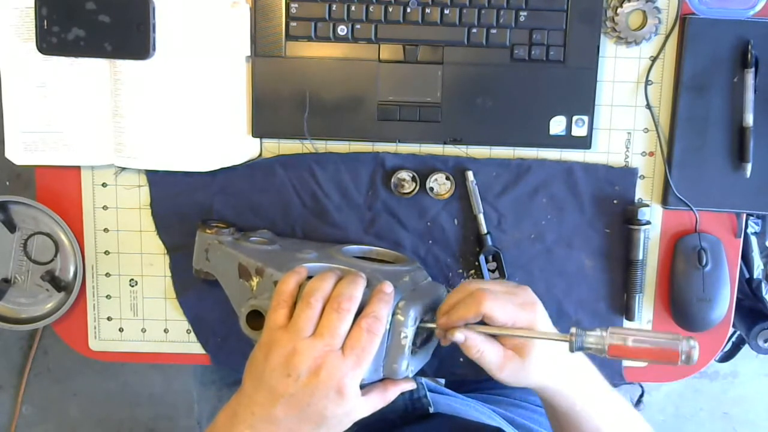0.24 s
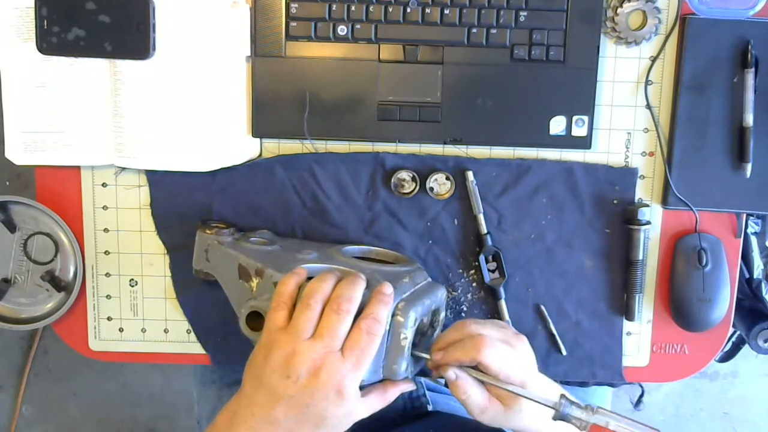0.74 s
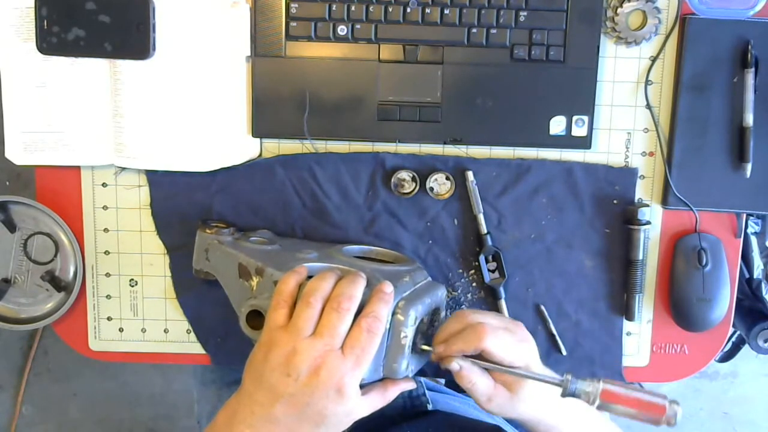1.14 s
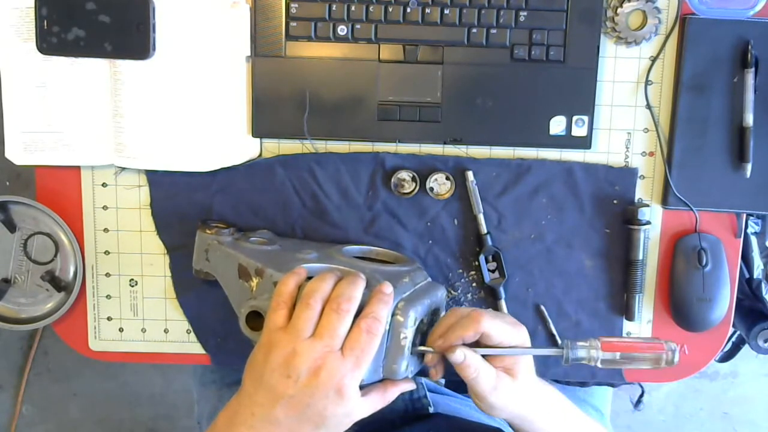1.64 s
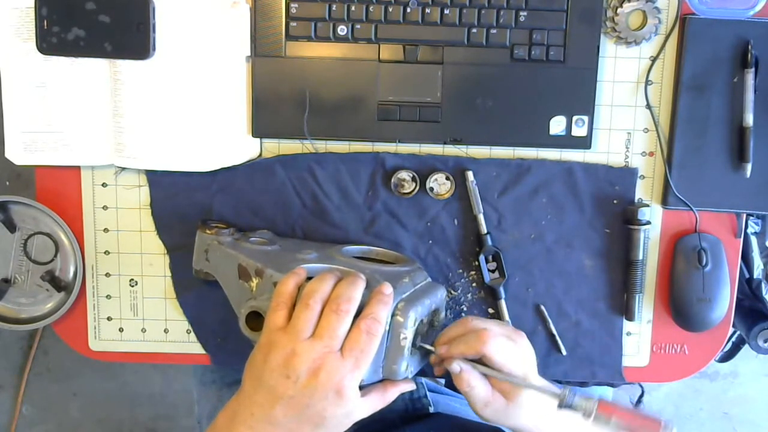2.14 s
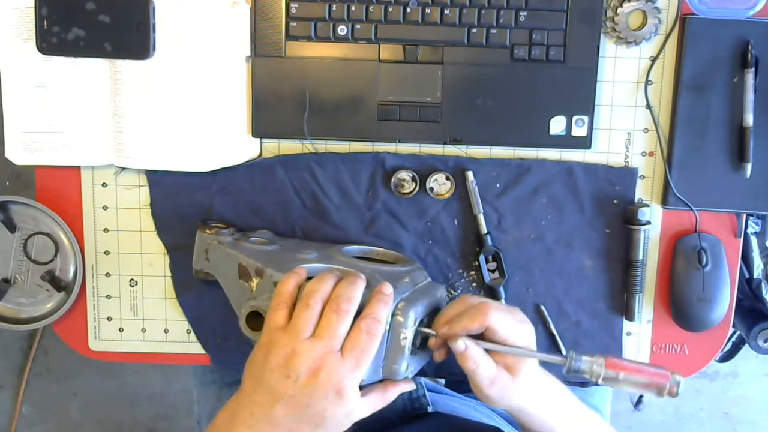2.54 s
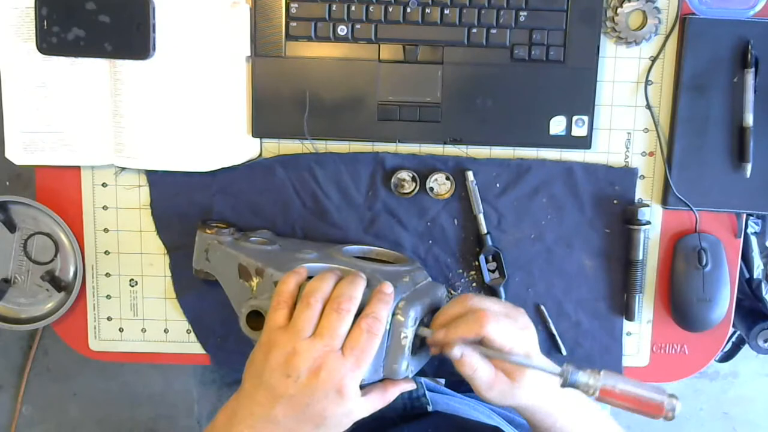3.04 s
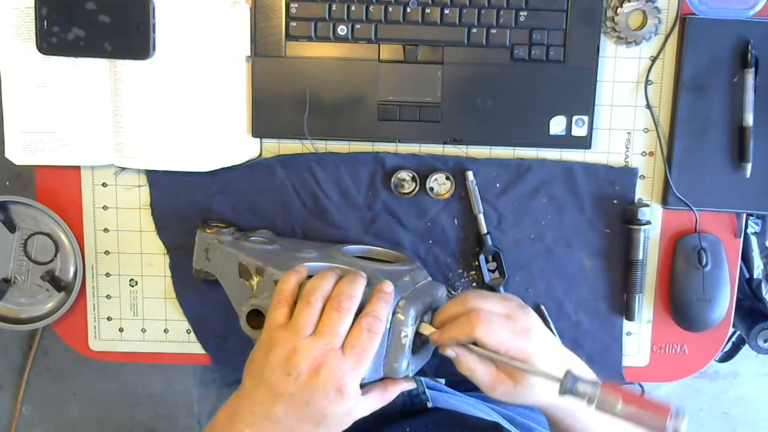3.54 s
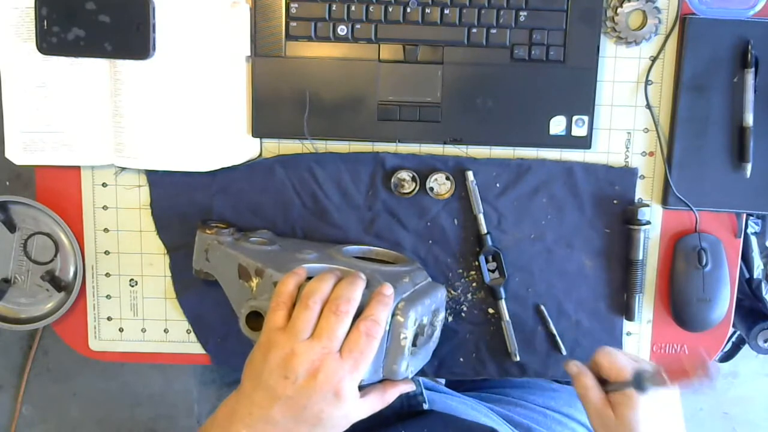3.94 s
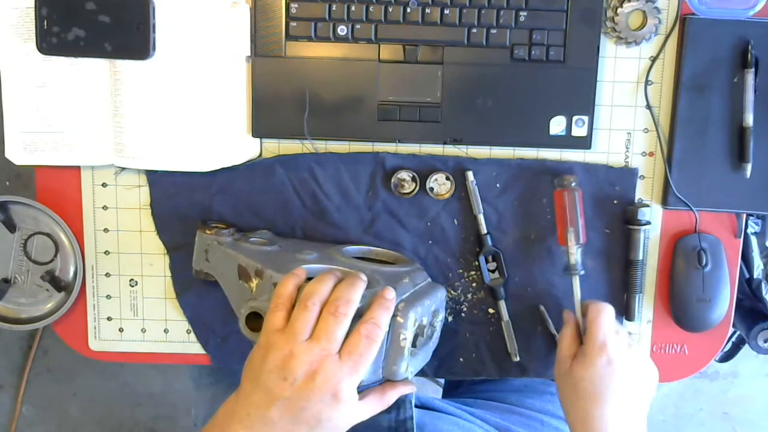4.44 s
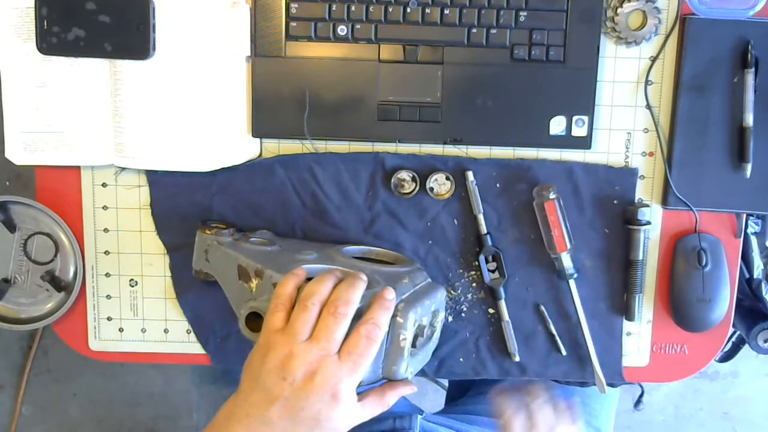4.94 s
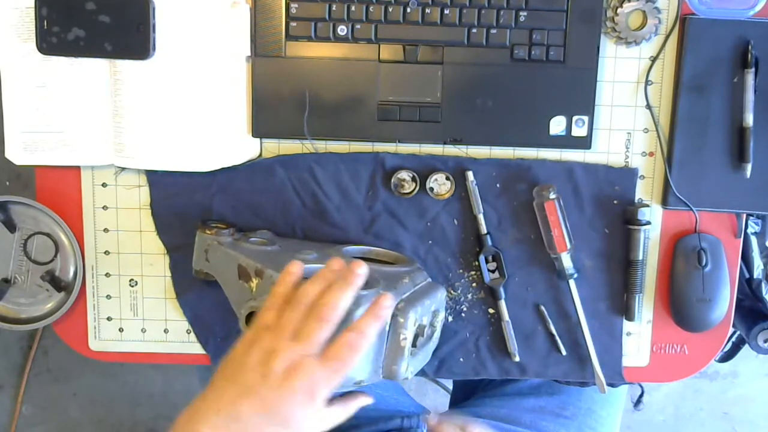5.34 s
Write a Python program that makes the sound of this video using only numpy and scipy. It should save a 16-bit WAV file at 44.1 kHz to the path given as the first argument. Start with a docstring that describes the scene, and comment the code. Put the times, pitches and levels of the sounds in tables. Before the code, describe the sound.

Close, muffled-top microphone in a small room, steady soft hiss. Brief gritty scratches and light clicks of a blade on cast metal come irregularly for over four seconds, with low shudders of the bench. Then a near pause with a faint rub of skin, a sudden loud metallic crack and woody thud, a short reverberant tail, and a last cluster of soft knocks and scrapes.

```python
"""A small room with a cloth-covered bench: a screwdriver blade picks and scrapes paint off a hollow metal casting.
Bursts of tiny clicks and single taps ring the casting's modes; flakes tick as filtered clicks.
The effort shakes the bench, heard as low resonant noise, with short tones when the casting judders.
At the end the casting tips, knocks on the bench and rocks back: ringing thuds, noise cracks, a room tail.
Under it all lies microphone hiss, mostly below about 8 kHz."""
import sys
import numpy as np
from scipy import signal
from scipy.io import wavfile

SR = 44100
rng = np.random.default_rng(int(sys.argv[2]) if len(sys.argv) > 2 else 0)


def store_wav(level_fs):
    """Save 16-bit WAV to argv[1]."""
    pcm = np.round(np.clip(np.atleast_2d(level_fs), -1, 1) * 32767)
    wavfile.write(sys.argv[1], SR, pcm.T.astype(np.int16))


N = 245637
TIME = np.arange(N) / SR
BITE_S = 0.2   # window that holds one bite, and either side of one jolt
RAGGED_DB = 1.5   # rms flicker of the uneven level


def from_db(db):
    """Gain of a level in dB."""
    return 10 ** (np.asarray(db) / 20)


def rms_one(x):
    """Scales a signal to rms 1."""
    return x / np.sqrt(np.mean(x ** 2) + 1e-20)


def level_curve(points):
    """Reads a (t/s, level/dB) curve at every sample."""
    times, levels_db = np.transpose(points)
    return np.interp(TIME, times, levels_db)


def at_hz(points, hz):
    """Reads a curve over frequency on a log axis."""
    freqs, values = np.array(points).T
    return np.interp(np.log(hz), np.log(freqs), values)


def steep(x, hz, kind, order):
    """A Butterworth filter."""
    return signal.sosfilt(signal.butter(order, hz, kind, fs=SR, output="sos"), x)


def add(track, s, part):
    """Lays a part into a track at a time in seconds."""
    at = round(s * SR)
    track[..., at:at + part.shape[-1]] += part[..., :N - at]


def arch(length_s):
    """Half a sine: swells and sinks once."""
    return np.abs(np.sin(np.pi * TIME[:round(length_s * SR)] / length_s))


def ring(force, hz, t60):
    """One damped mode: a unit click sets a sine of height 1 ringing."""
    radius = from_db(-60 / (t60 * SR))
    angle = 2 * np.pi * hz / SR
    # the tiny offset keeps the filter clear of denormal numbers
    return signal.lfilter([0, np.sin(angle)], [1, -2 * radius * np.cos(angle), radius ** 2], force + 1e-18)


def hum(peaks):
    """Noise through resonances of given bandwidth; rms 1."""
    total = 0
    for hz, width_hz, db in peaks:
        t60 = np.log(1000) / (np.pi * width_hz)
        total = total + from_db(db) * rms_one(ring(rng.standard_normal(N), hz, t60))
    return rms_one(total)


def bands(spectrum, length):
    """Third-octave noise bands shaped by a spectrum: centres and rows, together rms 1."""
    edges = 30 * 2 ** (np.arange(29) / 3)
    centres = np.sqrt(edges[1:] * edges[:-1])
    white = rng.standard_normal((2, length))   # neighbouring bands take different noise
    rows = np.array([from_db(at_hz(spectrum, hz)) * steep(white[k % 2], edges[k:k + 2], "band", order=3)
                     for k, hz in enumerate(centres)])
    return centres, rows / np.std(rows.sum(0))


def uneven():
    """A gain that flickers within a few ms."""
    return from_db(RAGGED_DB * rms_one(steep(rng.standard_normal(N), 120, "low", order=2)))


def grains():
    """Tiny catches of an edge on a rough surface: random clicks of uneven size; rms 1."""
    grains_per_s = 4000   # on average
    sizes = from_db(1.4 * np.minimum(rng.exponential(1, N), 4)) * rng.choice([-1, 1], N)
    return rms_one(sizes * (rng.random(N) < grains_per_s / SR))


def bite(db, slide_s):
    """Blade pressure that swells, slides and dies."""
    rise_s, dying_s = 0.0012, 0.049   # time constant of the swell; time to fall 60 dB
    after = TIME[:round(BITE_S * SR)]
    return from_db(db - 60 * np.maximum(after - slide_s, 0) / dying_s) * (1 - np.exp(-after / rise_s))


# colour of the hiss: (f/Hz, relative level/dB per Hz)
HISS_SPECTRUM = [(35, -46), (60, -24.5), (123, -22), (182, -21), (281, -4.5), (352, -6), (433, -7),
                 (653, -5), (889, -12), (1070, -9), (1790, -13.5), (3460, -21), (8200, -22.5),
                 (10700, -7.5), (18000, -120)]


def hiss():
    """Steady microphone noise: coloured hiss cut steeply at the top, over a much fainter, wider one."""
    coloured = from_db(-62) * bands(HISS_SPECTRUM, N)[1].sum(0)
    faint = from_db(-80) * steep(rng.standard_normal(N), 9000, "low", order=1)
    return steep(coloured, 8270, "low", order=14) + faint


# the arms lean on the bench top: (t/s, level/dB before the waver)
ARM_SHAKE = [(0.0, -63.5), (0.71, -70), (1.14, -70.5), (1.39, -62), (1.81, -70), (2.41, -71), (2.75, -64),
             (2.9, -63.5), (3.14, -64), (3.35, -63.5), (3.56, -66.5), (3.87, -67), (3.99, -68),
             (4.19, -67.5), (4.51, -63), (4.97, -69), (5.1, -77.5), (5.19, -59)]
# resonances of the bench top: (f/Hz, width/Hz, relative level/dB)
TOP_RESONANCES = [(223, 10, -3), (266.7, 12, 3.5), (300, 20, -0.5), (344.2, 19, 2.5)]


def top_hum():
    """The bench top murmurs under the working arms, which are never steady."""
    waver_db, waver_hz = 3.5, 14   # rms and upper edge of the unsteadiness
    waver = rms_one(steep(rng.standard_normal(N), waver_hz, "low", order=2))
    return from_db(level_curve(ARM_SHAKE) + waver_db * waver) * hum(TOP_RESONANCES)


# the frame is jolted: (t/s, peak level/dB of the added hum)
FRAME_JOLTS = [(0.24, -72), (0.76, -61), (0.86, -61), (1.229, -64), (1.84, -69), (2.08, -72), (2.61, -72),
               (2.75, -68), (2.881, -53.5), (3.285, -54), (3.335, -56), (3.57, -67), (3.71, -76),
               (3.9, -58.5), (4.03, -60.5), (4.43, -74), (4.96, -63.5)]
# resonances of the bench frame: (f/Hz, width/Hz, relative level/dB)
FRAME_RESONANCES = [(113, 170, 1), (138, 93, 2.5)]


def frame_hum():
    """The bench frame hums faintly and swells around each jolt."""
    rise_db_per_s, fall_db_per_s = 502, 370
    gain = np.full(N, from_db(-76.5))
    near = TIME[:round(2 * BITE_S * SR)] - BITE_S   # seconds before and after the jolt
    for s, db in FRAME_JOLTS:
        below_peak_db = np.maximum(-rise_db_per_s * near, fall_db_per_s * near)
        add(gain, s - BITE_S, from_db(db - below_peak_db))
    return gain * hum(FRAME_RESONANCES)


# where the blade meets the casting decides which modes answer:
# spot name: (level/dB of each of the five mode groups, from low f/Hz to high)
SPOT_SHARES = {"wall": (-6.5, -6, -17, -10, -15.5), "edge": (-14, -3.5, -21.5, -18.5, -18),
               "face": (-11, -9.5, -12.5, -11, -13), "rib": (-36, -15, -13.5, -1, -28),
               "boss": (-24, -15.5, -37, -17, -7), "lip": (-28, -8, -7, -14, -22),
               "flank": (-37, 5.5, -20, 2, -35), "crown": (-8, -28, -25, -5.5, -9),
               "foot": (6.5, -34, -7.5, -24, 6.5), "neck": (-1.5, -7.5, -9, -12.5, -23.5),
               "pit": (-20, -2.5, -19.5, -28, -31)}
# the blade bites and scrapes: (t/s, bite level/dB before the spot's share, slide/s,
# rasp level/dB added in the top group, spot)
BITES = [(0.119, -42, 0.02, 3, "neck"), (0.137, -48, 0.017, -4, "neck"), (0.339, -46, 0.015, 2, "face"),
         (0.386, -44, 0.014, 20, "rib"), (0.4934, -55.5, 0.0066, -2, "boss"),
         (0.7794, -61, 0.011, 0, "face"), (1.07, -56, 0.015, 0, "face"), (1.0994, -69, 0.011, 2, "face"),
         (1.3646, -40, 0.0096, 8, "flank"), (1.3885, -51, 0.022, 1, "rib"), (1.4652, -39, 0.011, 4, "lip"),
         (1.4757, -40, 0.014, 5, "edge"), (1.4974, -48.5, 0.02, -7, "edge"),
         (1.7873, -51.5, 0.012, -3, "boss"), (1.9036, -54.5, 0.0095, 0, "face"),
         (2.0096, -47.5, 0.015, 3, "edge"), (2.0204, -43, 0.0062, -10, "edge"),
         (2.0394, -56, 0.027, -2, "boss"), (2.066, -43, 0.012, 2, "edge"), (2.0774, -41, 0.011, 17, "pit"),
         (2.099, -41, 0.016, 6, "pit"), (2.127, -42, 0.017, 2, "face"), (2.583, -52, 0.016, -5, "edge"),
         (2.7064, -55.5, 0.02, -3, "wall"), (2.7494, -58, 0.023, 1, "face"),
         (2.7985, -51, 0.026, 0, "face"), (2.8617, -44, 0.014, 15, "rib"),
         (2.8726, -36.5, 0.0057, 29.5, "flank"), (2.8904, -42.5, 0.014, -1, "wall"),
         (3.244, -50, 0.018, -4, "boss"), (3.262, -44, 0.021, 12, "edge"),
         (3.2828, -40.5, 0.019, -7, "edge"), (3.306, -45, 0.016, 9.5, "edge"),
         (3.3275, -53, 0.01, 14, "edge"), (3.6606, -54.5, 0.011, -3, "wall"),
         (3.7026, -50, 0.0095, -1, "face"), (3.7116, -36.5, 0.02, -6.5, "face"),
         (3.7354, -45, 0.015, 1.5, "face"), (3.8415, -50, 0.018, 1, "face"),
         (3.856, -48.5, 0.016, -4, "face"), (3.8826, -38.5, 0.012, 5, "face"),
         (3.9904, -39.5, 0.015, -3, "wall"), (4.0013, -34, 0.011, 0, "wall"),
         (4.0186, -52, 0.012, 6, "wall"), (4.252, -52, 0.011, 18, "rib"), (4.2657, -49, 0.014, -1, "crown"),
         (4.276, -41, 0.018, -6, "boss"), (4.405, -43.5, 0.023, -6.5, "boss"),
         (4.4208, -31.5, 0.01, -10.5, "boss"), (4.441, -39.5, 0.009, -11, "crown"),
         (4.4597, -47.5, 0.012, 5.5, "face"), (5.489, -39.5, 0.01, 0, "crown"),
         (5.5124, -63.5, 0.013, 24, "crown"), (5.5378, -41, 0.014, -10, "crown"),
         (5.543, -41, 0.021, -7, "foot")]


def scrapes():
    """Pressure on the five mode groups: each bite leans on the groups its spot reaches."""
    pressure = np.zeros((5, N))
    for s, db, slide_s, rasp_db, spot in BITES:
        shares_db = np.array(SPOT_SHARES[spot], float)
        shares_db[-1] += rasp_db
        add(pressure, s, from_db(shares_db)[:, None] * bite(db, slide_s))
    return pressure


# modes of the hollow casting, in five groups from low to high: (f/Hz, relative level/dB, t60/s)
CASTING_MODES = [
    [(1310, -13.5, 0.0037), (1445, -11.5, 0.041), (1776, -15, 0.022)],
    [(2384, -7.5, 0.037), (2480, -7, 0.014), (2506, 0, 0.007), (2774, -10.5, 0.017)],
    [(3050, 2.5, 0.013), (3170, -17, 0.033), (3213, 4, 0.0084)],
    [(3450, -7.5, 0.011), (3865, -5, 0.035), (4100, -24, 0.013), (4270, -3, 0.0065), (4675, -5.5, 0.011)],
    [(5100, -8.5, 0.028), (5710, 0.5, 0.011), (5780, -8.5, 0.0083), (6330, -8.5, 0.041), (6290, -7, 0.013),
     (6560, -1.5, 0.0084), (7690, -24, 0.026)],
]


def casting():
    """Grains under the blade, skin and taps drive the metal's modes; flakes tick on top."""
    pressure = scrapes() + drags()
    pressure[3:5] += rub()
    out = flakes()
    for group, modes in enumerate(CASTING_MODES):
        catches = uneven() * grains()   # lumpy paint makes the grip flicker
        sound = np.zeros(N)
        for k, (hz, db, t60) in enumerate(modes):
            # each mode takes its own stretch of the grains; -23 dB sets a grain against a full tap
            force = from_db(-23) * pressure[group] * np.roll(catches, 997 * k)
            force += taps(group)
            sound += from_db(db) * ring(force, hz, t60)
        # little radiates between groups
        out += steep(sound, [0.95 * modes[0][0], 1.083 * modes[-1][0]], "band", order=2)
    return out


# the casting judders on the cloth and drives one bench mode for a moment: (t/s, f/Hz, level/dB, length/s)
JUDDER_TONES = [(0.157, 263, -52, 0.018), (0.192, 260, -59, 0.024), (0.694, 278, -53.5, 0.027),
                (1.184, 354, -54.5, 0.038), (1.328, 271, -48, 0.034), (1.409, 270, -48, 0.031),
                (1.511, 275, -56, 0.039), (2.463, 328, -57, 0.0255), (2.616, 264, -53, 0.018),
                (2.795, 273.5, -53.5, 0.033), (2.874, 254, -50, 0.031), (3.157, 299.5, -56, 0.093),
                (3.264, 260.3, -45.5, 0.092), (3.304, 215, -45, 0.052), (3.763, 274, -58, 0.065),
                (3.877, 224.5, -44, 0.038), (3.882, 261.4, -40, 0.075), (3.961, 300, -51.5, 0.025),
                (4.181, 310, -51.5, 0.015), (4.339, 278, -51, 0.023), (4.594, 289, -59, 0.12),
                (5.14, 645, -57, 0.014)]


def judders():
    """Short steady tones of the bench with a quick swell and a quick end."""
    out = np.zeros(N)
    for s, hz, db, length_s in JUDDER_TONES:
        swell = arch(length_s) ** 0.28   # flattens the arch
        tone = np.sin(2 * np.pi * (hz * TIME[:len(swell)] + rng.random()))
        add(out, s, from_db(db) * swell * tone)
    return out


# the metal is struck once, by the tip or by the bench: (t/s, level/dB before the spot's share, spot)
STRIKES = [(0.389, -32.5, "boss"), (1.3594, -29.5, "flank"), (1.3604, -19.5, "rib"), (1.4704, -35, "lip"),
           (2.0817, -30.5, "pit"), (2.1322, -33.5, "edge"), (2.588, -43, "pit"), (2.875, -40, "flank"),
           (2.8796, -32.5, "flank"), (2.884, -32.5, "neck"), (3.7197, -45, "face"), (3.7402, -44, "lip"),
           (3.8843, -35.5, "boss"), (4.0047, -32, "crown"), (4.2795, -37.5, "crown"), (4.461, -48, "lip"),
           (5.1963, -6.5, "crown"), (5.4853, -33.5, "crown"), (5.5374, -36, "crown")]


def taps(group):
    """Single clicks into a mode of one group; no two taps strike a mode alike."""
    spread_db = 0.5
    force = np.zeros(N)
    for s, db, spot in STRIKES:
        tap_db = db + SPOT_SHARES[spot][group] + spread_db * rng.standard_normal()
        force[round(s * SR)] += from_db(tap_db) * rng.choice([-1, 1])
    return force


# the blade drags lightly between bites: (t/s, length/s, level/dB of pressure on the strongest group)
LIGHT_DRAGS = [(0.75, 0.12, -63.5), (1.02, 0.2, -63), (1.95, 0.17, -59.5), (2.565, 0.045, -55),
               (2.68, 0.17, -67), (3.094, 0.1, -58)]


def drags():
    """Light pressure that swells and sinks, shared among the mode groups as on the edge."""
    pressure = np.zeros((5, N))
    shares_db = np.array(SPOT_SHARES["edge"]) - SPOT_SHARES["edge"][1]   # 0 dB in the strongest group
    for s, length_s, db in LIGHT_DRAGS:
        add(pressure, s, from_db(db + shares_db)[:, None] * arch(length_s))
    return pressure


# paint flakes break off: (t/s, level/dB before the flake gain and filter)
FLAKE_BREAKS = [(1.4763, -65), (2.13, -58), (2.8634, -68), (2.8715, -44), (2.8904, -71), (3.307, -61)]


def flakes():
    """Brief bursts of grains, heard only in the high treble."""
    flaking = np.zeros(N)
    for s, db in FLAKE_BREAKS:
        add(flaking, s, bite(db, slide_s=0.015))
    return steep(from_db(-13) * flaking * grains(), [7500, 11500], "band", order=2)


# a hand slides over the casting: (t/s, level/dB of pressure on the top group)
HAND_RUB = [(4.8, -110), (4.88, -77), (5.0, -67), (5.1, -64.5), (5.18, -55), (5.2, -110)]


def rub():
    """Pressure of skin on the two highest mode groups, the lower of them 8 dB weaker."""
    return from_db(level_curve(HAND_RUB) + [[-8], [0]])


# modes of the bench: (f/Hz, relative level/dB, t60/s)
BENCH_MODES = [(120.4, -22, 1), (152.3, -10.5, 0.31), (181.3, -16, 0.45), (196, 8.5, 0.069),
               (203.3, -7.5, 0.42), (235, -6.5, 0.25), (300, -17, 0.35), (366, -17.5, 0.41),
               (477, 6, 0.029), (480, -34.5, 0.72), (595, -9, 0.067), (690, -24, 0.091), (744, -7, 0.031),
               (800, -9.5, 0.37), (1000, -30.5, 0.2765), (1060, -6.5, 0.075), (1142, -9, 0.17),
               (1218, -27.5, 0.23), (1400, -15, 0.076), (1813, -22.5, 0.32), (1980, -0.5, 0.024)]


def thud(after, cut_hz):
    """A soft push rings the bench modes; a lower contact cut makes the push slower and duller."""
    soft = np.exp(-2 * np.pi * cut_hz / SR)
    push = signal.lfilter([(1 - soft) ** 3], np.poly([soft] * 3), after == 0)   # a click softened three times
    return -sum(from_db(db) * ring(push, hz, t60) for hz, db, t60 in BENCH_MODES)


# colour of the crack: (f/Hz, relative level/dB per Hz)
CRACK_SPECTRUM = [(350, -27.5), (600, 11.5), (1600, -14.5), (2190, -18.5), (2790, -8), (4490, -10.5),
                  (5980, -18.5), (6580, -16), (7540, -15.5), (8290, -37), (15500, -43)]


def crack(after):
    """A burst of coloured noise that dies quickly."""
    t60_s = 0.042
    return bands(CRACK_SPECTRUM, len(after))[1].sum(0) * from_db(-60 * after / t60_s)


# colour of the room's answer: (f/Hz, relative level/dB per Hz)
TAIL_SPECTRUM = [(180, -22), (300, -2.5), (360, -0.5), (468, -13.5), (720, -7.5), (808, -3.5), (1000, -17),
                 (1120, -13.5), (1280, -13.5), (1390, -15), (2560, -20.5), (6360, -21), (15500, -53)]
# decay of the room at its first slope: (f/Hz, t60/s)
TAIL_DECAY = [(100, .5), (210, 0.58), (400, 0.49), (800, 0.56), (1200, 0.46), (1800, 0.35), (3000, 0.34),
              (5500, 0.33), (7200, 0.26), (8500, 0.19), (11000, 0.12), (15000, .13)]


def room_tail(after):
    """Coloured noise that dies band by band, its decay steepening as it goes."""
    bend = 0.59   # strength of the steepening
    centres, rows = bands(TAIL_SPECTRUM, len(after))
    gone = after / at_hz(TAIL_DECAY, centres)[:, None]
    decayed = rows * from_db(-60 * (gone + bend * gone ** 2))
    return decayed.sum(0) * (1 - np.exp(-after / 0.0013))


# casting on bench: (t/s, thud level/dB, crack level/dB, contact cut f/Hz)
BENCH_KNOCKS = [(5.1966, -11, -5, 2880), (5.223, -25, -26, 900), (5.257, -30.5, -45, 500),
                (5.473, -31.5, -62, 300), (5.487, -29.5, -47.5, 705), (5.539, -16.5, -55.5, 430),
                (5.553, -22.5, -54, 800), (5.563, -25.5, -56, 590)]


def knocks():
    """Each knock is a push into the bench modes, a short crack and a room tail."""
    out = np.zeros(N)
    rattle = uneven()   # loose things on the bench rattle along: the tail flickers
    for s, thud_db, crack_db, cut_hz in BENCH_KNOCKS:
        at = round(s * SR)
        after = TIME[:N - at]
        out[at:] += from_db(thud_db) * thud(after, cut_hz)
        tail = from_db(-14) * room_tail(after) * rattle[at:]
        out[at:] += from_db(crack_db) * (crack(after) + tail)
    return steep(out, 130, "high", order=4)   # the bench is too small to radiate deep bass


def scene():
    """Hiss, humming bench, scraped casting and knocks; the hum stops at the first knock."""
    working = TIME < BENCH_KNOCKS[0][0]
    bench = (top_hum() + frame_hum()) * working + judders()
    return (hiss() + bench + casting() + knocks())[None]


def record(dry):
    """The microphone drops the deep bass; peaks are rounded, the top is cut."""
    heard = steep(dry, 90, "high", order=3)
    rounded = 1.048 * np.tanh(heard / 1.101)
    return signal.sosfilt(signal.cheby2(20, 70, 16100, fs=SR, output="sos"), rounded)


dry = scene()
out = record(dry)
store_wav(out)
```